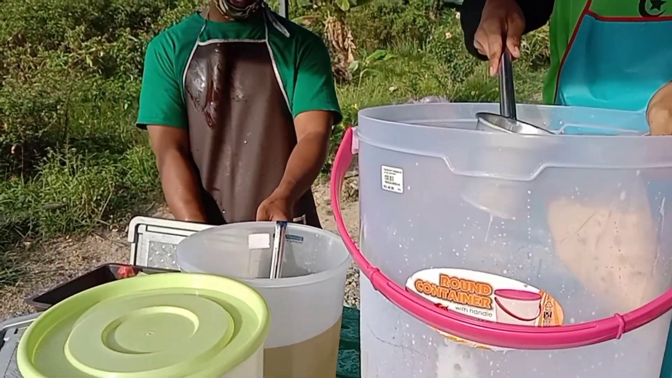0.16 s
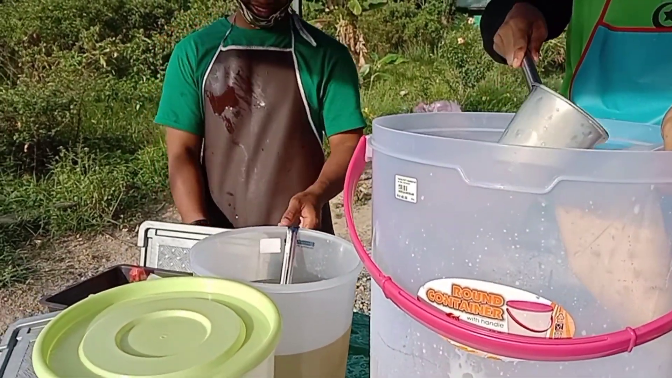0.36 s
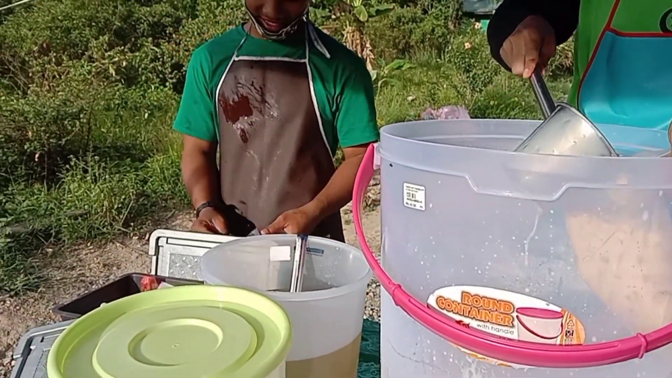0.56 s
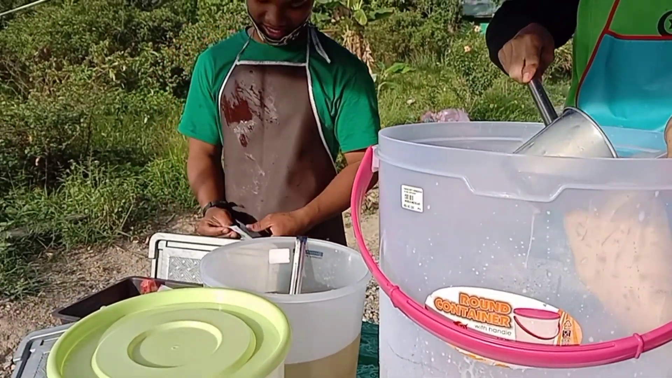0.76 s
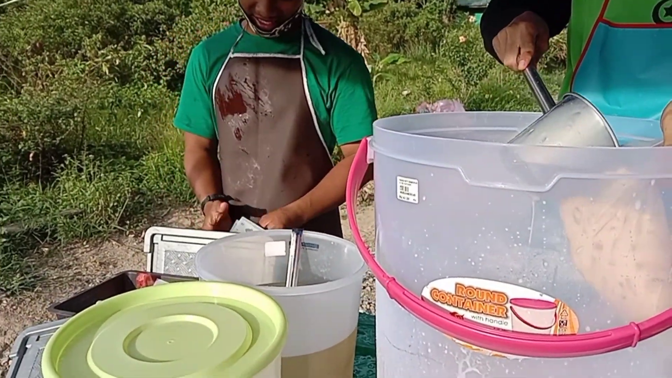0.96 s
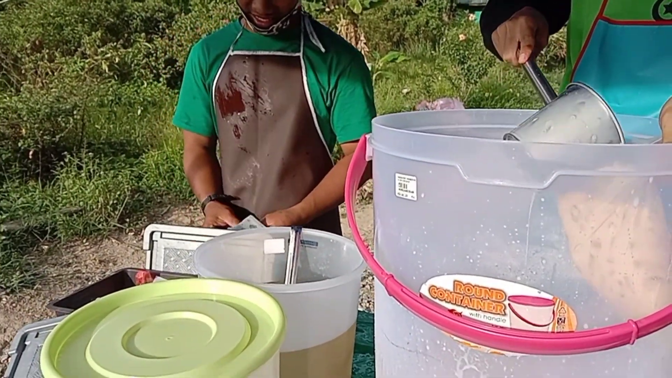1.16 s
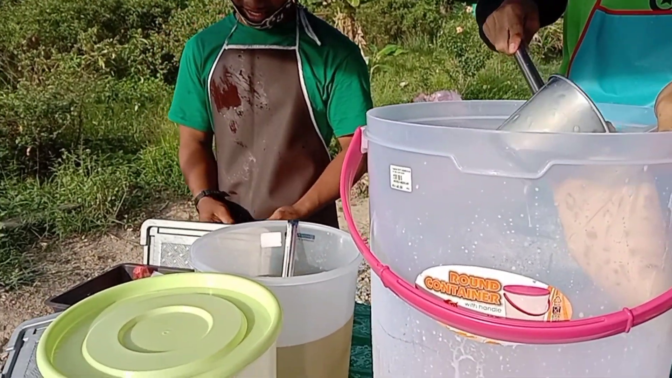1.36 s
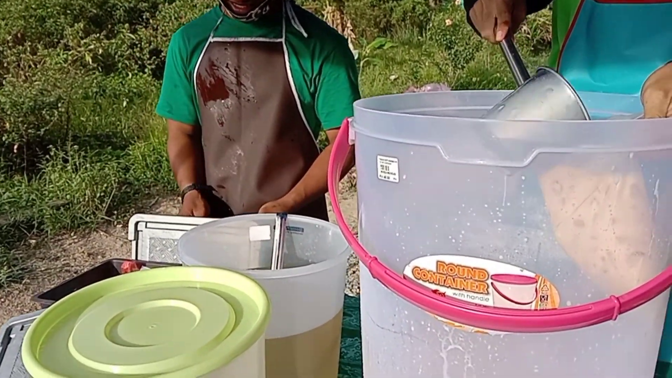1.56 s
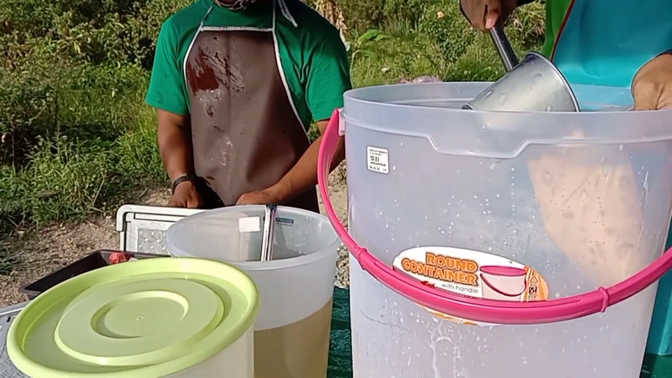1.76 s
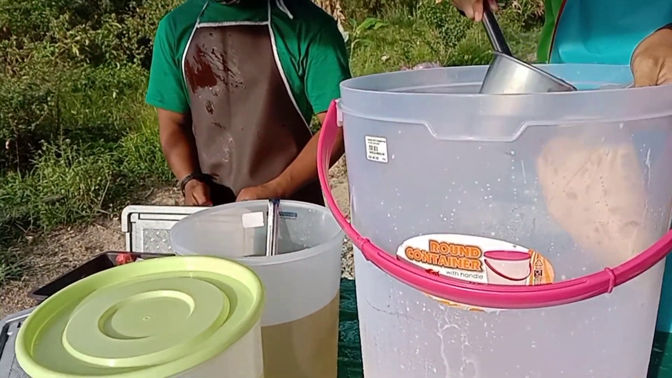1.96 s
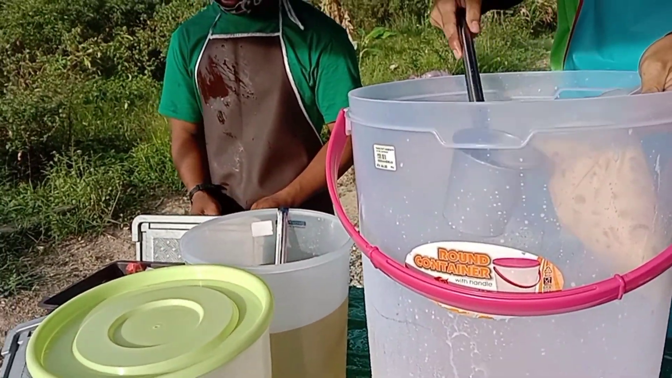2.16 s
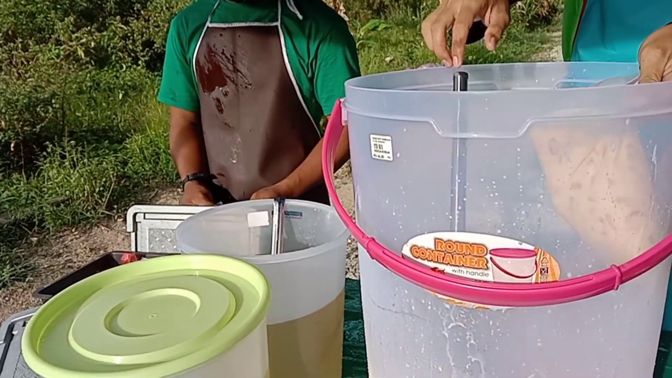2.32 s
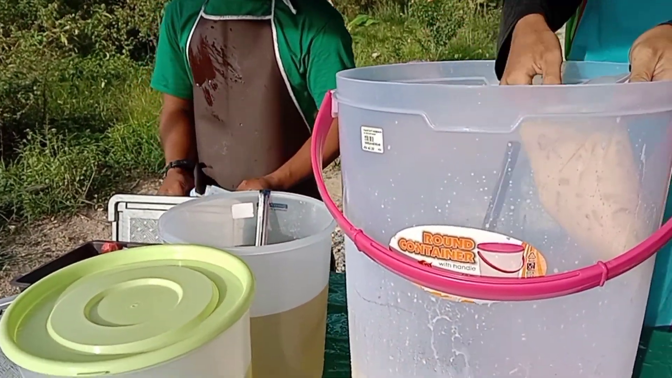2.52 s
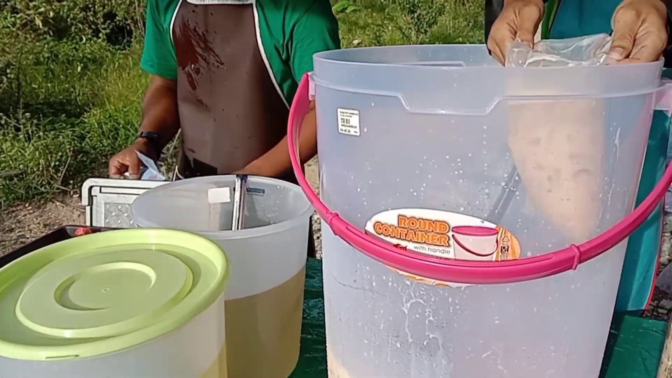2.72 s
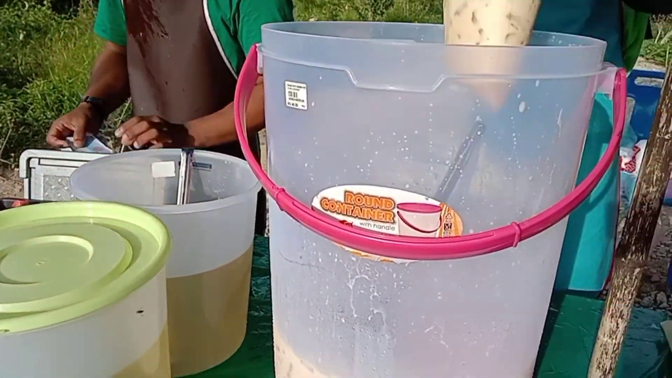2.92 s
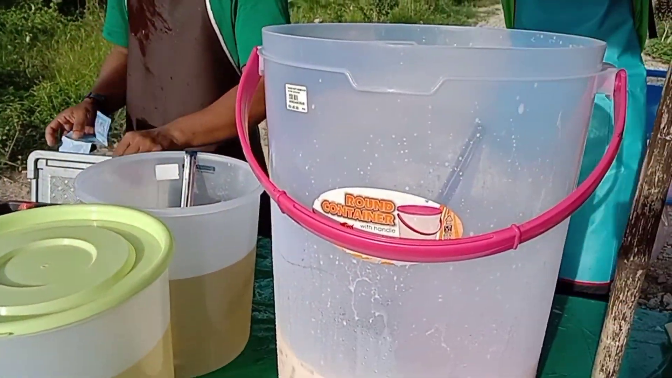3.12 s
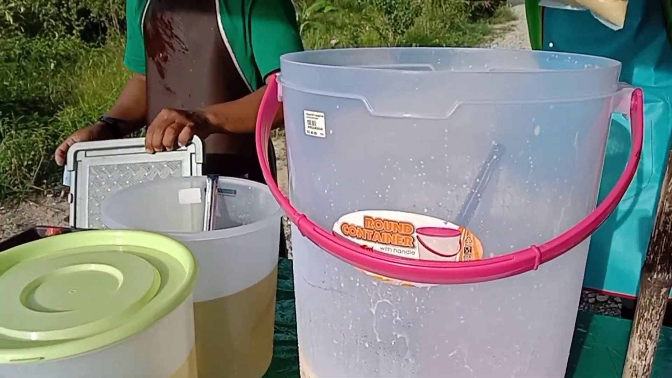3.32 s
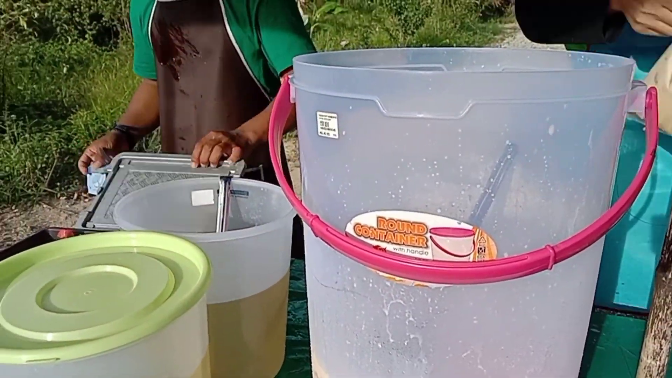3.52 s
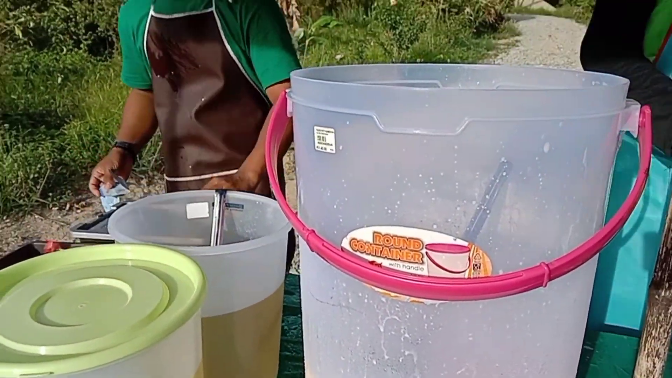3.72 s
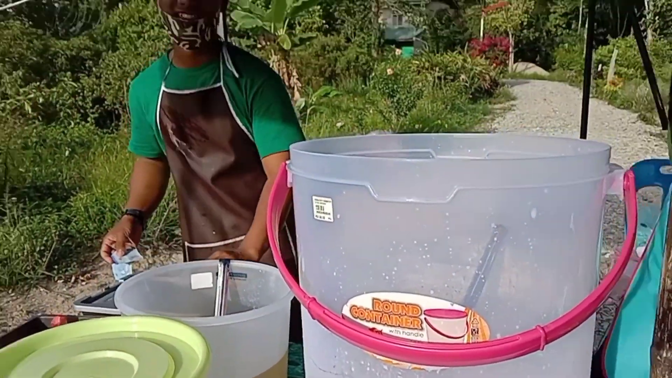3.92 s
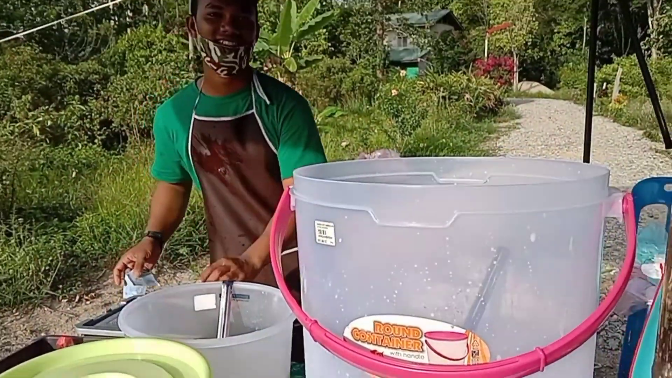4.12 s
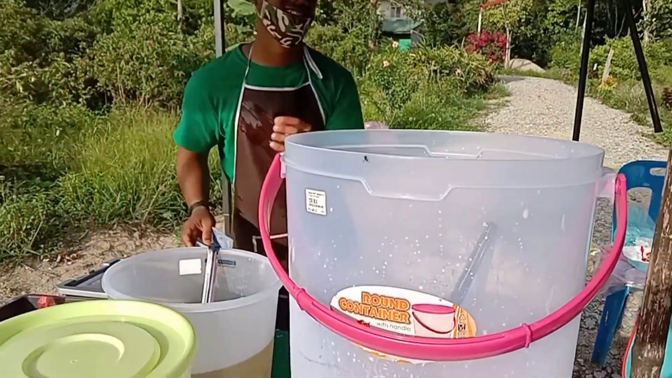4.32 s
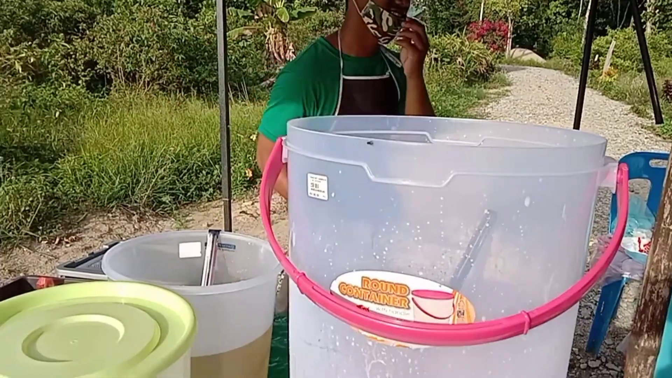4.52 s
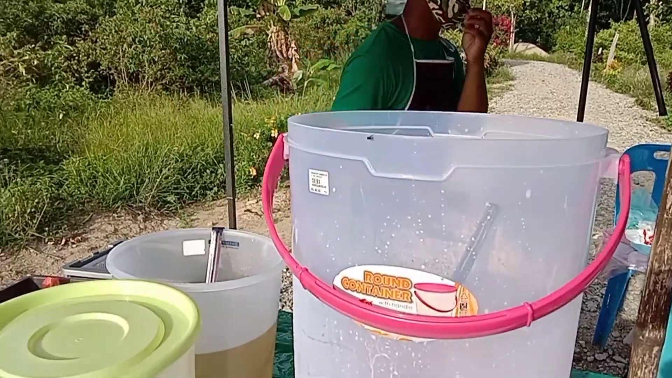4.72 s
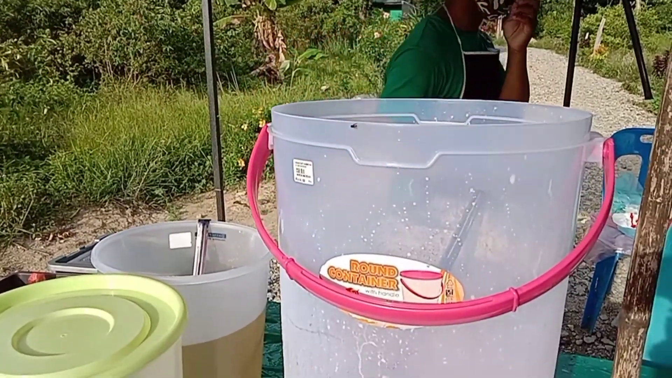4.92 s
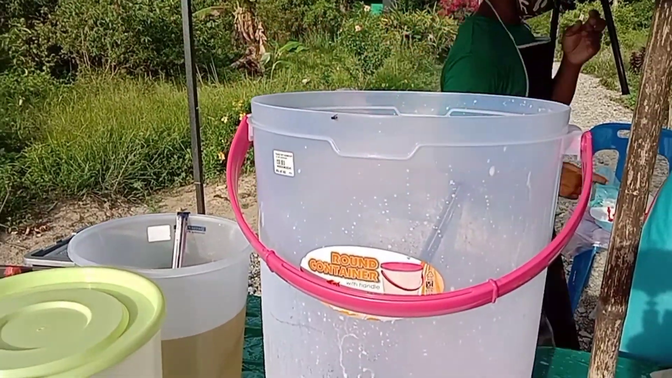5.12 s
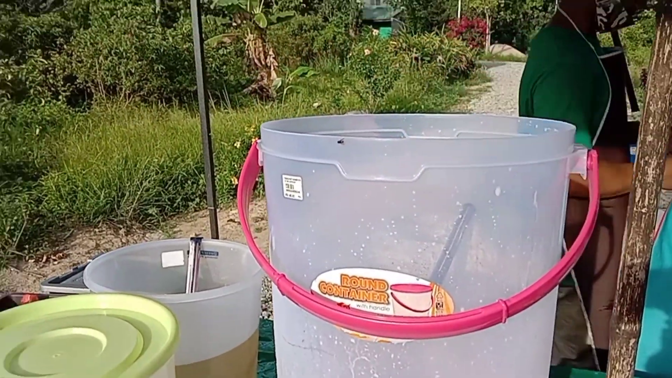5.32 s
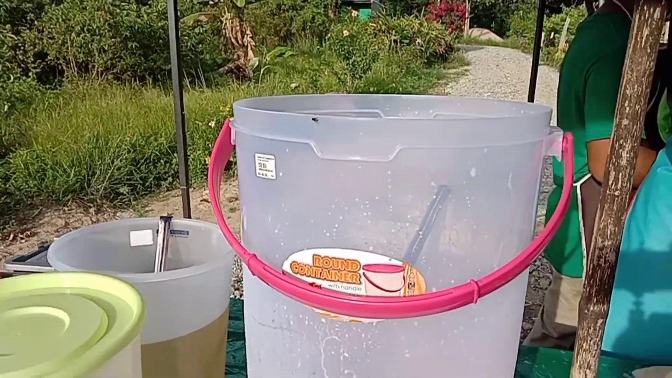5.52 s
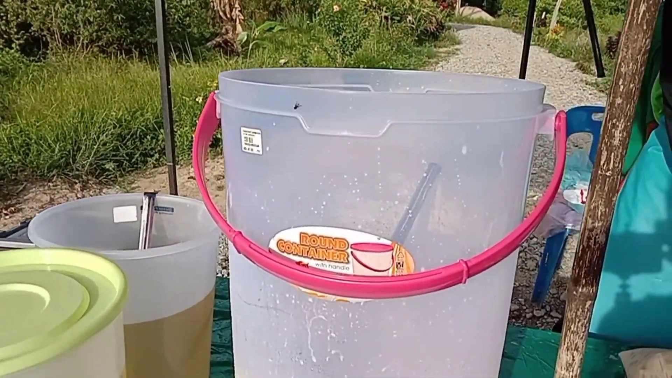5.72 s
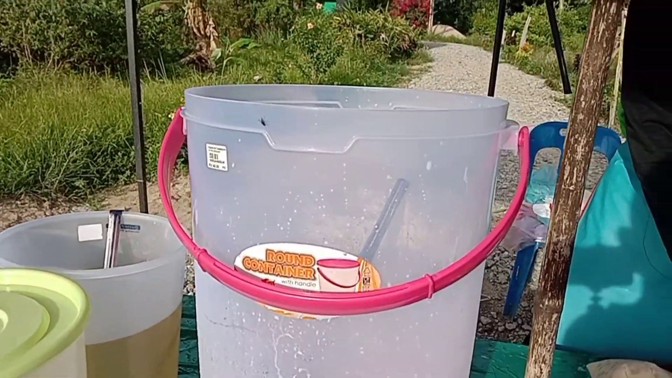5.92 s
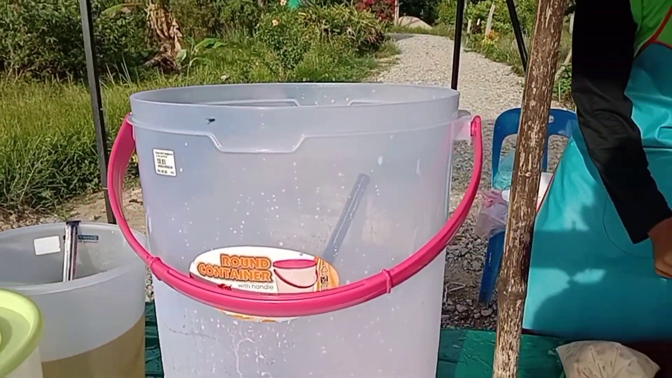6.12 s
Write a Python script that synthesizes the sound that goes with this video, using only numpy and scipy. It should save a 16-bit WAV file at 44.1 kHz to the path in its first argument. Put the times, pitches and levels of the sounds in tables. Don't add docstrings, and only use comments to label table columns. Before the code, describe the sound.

Hollow tub knocks and wet slosh give way to pouring gulps, a dipper plunge, bumps, and busy crisp crackling of thin plastic outdoors.

```python
import sys
import numpy as np
from scipy import signal
from scipy.fft import rfft, irfft
from scipy.io import wavfile
from scipy.ndimage import uniform_filter1d

SR = 44100
rng = np.random.default_rng(int(sys.argv[2]) if len(sys.argv) > 2 else 0)


def to_wav(sig):
    pcm = np.clip(np.atleast_2d(sig), -1, 1) * 32767
    pcm = np.round(pcm).astype(np.int16)
    wavfile.write(sys.argv[1], SR, pcm.T)


def gain_from_db(level_db):
    decades = np.asarray(level_db, float) / 20
    return 10 ** decades


N = 276663

# (frequency [Hz], level [dB per Hz])
AIR_SPECTRUM = [(30, 7.5), (164, 4), (575, -1.5), (1300, 6.5), (4200, 7.5), (5600, 9), (8900, -21),
                (15500, -14)]
# (time [s], rate [firings per s], level [dB])
ENGINE_RUN = [(0, 30.1, -62.5), (1.2, 30.0, -65.5), (2.3, 29.4, -72), (4.0, 29.4, -69.5), (6.27, 26, -76.5)]
# (frequency [Hz], width [Hz], level [dB])
EXHAUST_MODES = [(135, 50, -3), (172, 40, 0), (315, 50, -15)]
# (time [s], level [dB])
INSECT_SONG = [(0, -70), (2.4, -73), (3.7, -73), (4.2, -75), (6.27, -79)]
# (time [s], peak [dB], frequency [Hz], t60 [s])
TUB_RUMBLES = [
    (0.001, -27.5, 130.3, 0.2),
    (.03, -31, 510, 0.23),
    (.065, -29, 120, 0.3),
    (.125, -31, 180, 0.28),
    (2.454, -29.5, 290, 0.44),
    (2.452, -15.5, 1200, 0.57),
    (4.09, -48, 310, .15),
    (3.89, -27.5, 266, 0.2),
]
# (time [s], peak [dB], frequency [Hz], t60 [s])
TABLE_THUMPS = [(.147, -11, 216, 0.13), (.160, -8.5, 198, 0.06), (.176, -21, 146, 0.13),
                (.44, -18, 328, 0.036), (2.465, -25, 186, 0.46), (2.49, -27, 349, 0.41),
                (2.47, -38, 97, 0.27), (2.678, -16, 207, 0.27), (2.68, -35.5, 91, 0.2),
                (2.676, -10, 768, 0.18), (2.75, -23.5, 191, 0.07), (3.412, -42, 442, 0.41),
                (3.44, -29, 171, 0.072), (3.474, -33, 348, 0.15), (3.50, -40.5, 466, 0.22),
                (3.604, -36.5, 314, 0.13), (3.668, -34.5, 306, 0.088), (3.833, -7, 330, 0.11),
                (3.835, -26, 108, 0.21), (3.836, -18.5, 197, 0.17), (3.86, -22.5, 312, 0.083),
                (3.93, -32, 283, 0.164), (3.97, -29, 394, 0.032), (.435, -17.5, 540, 0.066),
                (4.16, -45.5, 446, 0.48), (4.18, -40.5, 103, 0.069)]
# (time [s], peak [dB])
TUB_KNOCKS = [(0.012, -14.5), (0.03, -20), (0.0709, -8.5), (0.1185, -12), (0.144, -15), (0.16, -17),
              (0.175, -16), (.225, -24), (.285, -30.5), (0.4181, -22.5), (0.431, -20.5), (0.438, -3),
              (0.445, -29.5), (0.479, -23), (0.512, -42), (2.465, -9.5), (2.484, -14.5), (2.499, -13),
              (2.519, -16.5), (2.545, -23), (2.6, -46.5), (2.675, -8.5), (2.697, -25), (2.712, -24.5),
              (2.74, -28), (3.821, -30), (3.472, -48), (3.834, -22), (3.858, -20)]
# (frequency [Hz], level [dB], t60 [s])
TUB_MODES = [(650, -16.5, 0.039), (750, 2, 0.011), (778.5, 1.5, 0.09), (880, -18.5, 0.12), (925, -11, 0.13),
             (1070, -19.5, 0.06), (1242, -5, 0.059), (1290, 8, 0.018), (1230, -12, 0.0088),
             (1914, -19.5, 0.0066), (2655, -8, 0.0054), (3300, -32.5, 0.0079)]
# (time [s], peak [dB], frequency [Hz], t60
# [s])
CLEAR_NOTES = [(.255, -33.5, 797, .5), (.43, -24.5, 3840, 0.072), (.446, -20, 1254, 0.054),
               (.495, -37.5, 1936, 0.18), (.908, -25.5, 2030, 0.047), (.93, -41, 1430, .1),
               (1.138, -34, 2866, 0.08), (2.07, -53, 2526, 0.24), (3.765, -51.5, 952, .1),
               (3.305, -50.5, 1530, 0.17), (1.866, -44, 4850, .08)]
# (time [s], peak [dB], frequency [Hz], t60 [s])
BAG_DRIPS = [(.93, -49, 925, 0.18), (1.02, -46.5, 518, 0.088), (1.365, -41.5, 1430, 0.098),
             (1.445, -51.5, 1070, 0.087), (1.55, -57, 1600, 0.092), (1.547, -38.5, 2570, 0.057),
             (1.615, -58.5, 2000, 0.22), (1.602, -57, 795, 0.52), (1.62, -59, 1304, 0.26),
             (1.74, -57.5, 1668, 0.29), (1.79, -34.5, 3300, 0.018), (1.905, -54, 1040, 0.12),
             (2.115, -41.5, 1290, 0.047), (2.165, -41, 1290, 0.092), (2.345, -58, 2470, 0.5),
             (3.135, -32.5, 2840, 0.03), (3.135, -45.5, 1252, 0.19)]

# (frequency [Hz], level [dB per Hz])
FILM_SPECTRUM = [(4200, 3.5), (5580, 4.5), (7660, -1.5), (9220, -11.5), (11900, -7.5), (14800, -9.5),
                 (15500, -6)]
# (frequency [Hz], level [dB per Hz])
WATER_SPECTRUM = [(1150, -6), (1390, 3), (1880, 0), (2810, 1), (3600, 0.5), (4400, -15)]
# (frequency [Hz], level [dB per Hz])
BODY_SPECTRUM = [(1200, -13.5), (1420, 8), (1690, 6.5), (2080, 0.5), (2800, -1.5), (3280, 4.5),
                 (3770, -3.5), (4400, -14.5)]
# (frequency [Hz], level [dB per Hz])
SLOSH_SPECTRUM = [(450, -20.5), (752, -4), (950, -8.5), (1140, -10), (1250, -4)]
# (frequency [Hz], level [dB per Hz])
UNDERSIDE_SPECTRUM = [(450, -20), (801, -15), (1250, -7.5)]
# (time [s], level [dB])
HAND_ACTIVITY = [(0, -38), (.23, -47), (.6, -59.5), (1.08, -48.5), (1.87, -61), (2.39, -59), (2.5, -39),
                 (2.62, -62), (2.68, -46), (2.81, -38), (3.25, -58.5), (3.6, -56.5), (4.16, -49),
                 (4.63, -52), (4.75, -65.5), (4.99, -50), (5.58, -58), (6.27, -60)]
STILL_TIMES = [1.71, 2.01, 2.28, 3.26, 4.86]
# (time [s], level [dB], rise [s], t60 [s])
TUB_ROCKING = [
    (0, -25.5, 0.00041, 0.44),
    (2.52, -19.5, 0.2, 0.73),
]

# (time [s], peak [dB], body [dB re peak], t60 [s])
DIPPER_SPLASHES = [
    (.002, -49, 27, .15),
    (.068, -37, 19, 0.13),
    (.1106, -30, 10, 0.22),
    (.1294, -38, 5.5, 0.19),
    (.2735, -44.5, -7.5, 0.23),
    (.3337, -26.5, -20.5, 0.31),
    (.3935, -47.5, -2, 0.61),
    (.4205, -17, 3, 0.11),
    (.4994, -51, 11.5, 0.15),
]
# (time [s], peak [dB], body [dB re peak], t60 [s])
DIPPER_PLUNGE = [
    (2.452, -8, -0.5, 0.27),
]
# (time [s], peak [dB], body [dB re peak], t60 [s])
POURED_GULPS = [(.6255, -38.5, -3.5, 0.23), (.6995, -45, 1, 0.12), (.8594, -39, -5.5, 0.21),
                (.9064, -33.5, 3, 0.16), (1.0061, -35, 6.5, 0.1), (1.064, -33.5, 11, .044),
                (1.1324, -30, -0.5, 0.08), (1.1974, -28.5, 2.5, 0.095), (1.2403, -32, 6.5, 0.084),
                (1.3096, -57, -19, 0.071), (1.3583, -35.5, -2.5, 0.19), (1.4408, -24, -13.5, 0.075),
                (1.5455, -49.5, 6.5, 0.08), (1.6142, -38.5, -3.5, 0.12), (1.7903, -37, -12, 0.04),
                (1.8662, -53.5, -11, 0.14), (1.9024, -67, 12.5, 0.13), (2.0842, -46.5, 3.5, 0.14),
                (2.1081, -39.5, -2, 0.22), (2.1563, -28.5, -9.5, 0.12), (2.3458, -32, -10.5, 0.076)]
# (time [s], peak [dB], body [dB re peak], t60 [s])
BAG_BUMPS = [
    (2.5744, -36, 6.5, 0.16),
    (2.674, -13.5, -4.5, 0.15),
    (2.7757, -27, -6, 0.08),
    (3.4095, -33, 2.5, 0.053),
    (3.4705, -39.5, 3.5, 0.12),
    (3.599, -41, 2.5, 0.084),
    (3.7939, -39.5, -7.5, 0.084),
    (3.8139, -24.5, 1.5, 0.21),
    (3.942, -31, -1, 0.053),
    (3.964, -38.5, -6.5, 0.063),
]
# (time [s], peak [dB], body [dB re peak], t60 [s])
GATHERING_SNAPS = [(2.5986, -30, -1, 0.34), (2.883, -21, -8.5, 0.15), (2.9638, -20, -13, .025),
                   (3.0007, -37.5, 5.5, 0.054), (3.0428, -35, -9, 0.029), (3.08, -35, -11.5, 0.021),
                   (3.1312, -31, -7.5, 0.15), (3.3454, -30.5, -7, 0.041), (3.3733, -40, -1, 0.024),
                   (3.52, -40, -5, 0.18), (3.63, -40, -10.5, 0.073), (3.75, -43, -9, 0.078),
                   (4.0355, -20.5, -39, 0.016), (4.0923, -29.5, -15.5, 0.068), (4.1286, -31, -5.5, 0.3),
                   (4.1695, -52, 11, 0.53), (4.2046, -39, -27, 0.024), (4.2623, -35.5, -6, 0.26),
                   (4.3081, -26, -6.5, 0.052)]
# (time [s], peak [dB], body [dB re peak], t60 [s])
TYING_SNAPS = [(4.4085, -30.5, -12, 0.17), (4.4365, -30.5, -9, 0.047), (4.452, -29.5, -15, 0.13),
               (4.4832, -32, -1.5, 0.33), (4.5646, -17, -7.5, 0.24), (4.5969, -20.5, -19.5, 0.037),
               (4.6255, -23, -40, 0.066), (4.6569, -21.5, -15.5, 0.028), (4.677, -29.5, -18, 0.046),
               (4.7164, -32.5, -18, 0.064), (4.7439, -35.5, -12.5, 0.51), (4.7657, -26.5, -9, 0.1),
               (4.7967, -26.5, -8.5, 0.034), (4.809, -29.5, -8.5, 0.024), (4.8969, -38.5, -28, 0.049),
               (4.9089, -16, -21, 0.15), (4.932, -35.5, -3, 0.064), (4.9657, -28, -5, 0.11),
               (4.984, -29.5, -0.5, 0.25), (5.022, -18.5, -8.5, 0.072), (5.081, -27.5, -1, 0.14),
               (5.1169, -30.5, -9, 0.041), (5.211, -37, -6, 0.43), (5.2833, -29, -7.5, 0.24),
               (5.3039, -28.5, 5, 0.041), (5.374, -35.5, -4.5, 0.32), (5.4118, -26.5, -8.5, 0.088)]
# (time [s], peak [dB], body [dB re peak], t60 [s])
CARRYING_SNAPS = [(5.4687, -37.5, -10, .13), (5.499, -24.5, -15, 0.043), (5.5379, -31, -17.5, 0.015),
                  (5.6173, -36, -7.5, 0.04), (5.6548, -32, -0.5, 0.061), (5.7619, -24.5, -7.5, 0.048),
                  (5.7998, -31.5, -5, 0.38), (5.8612, -28, -6.5, 0.025), (5.8795, -31.5, -16, .028),
                  (5.915, -37.5, -9, 0.075), (6.0064, -35.5, -6, 0.19), (6.062, -25.5, -8.5, 0.094),
                  (6.0927, -30.5, -16.5, 0.033), (6.1885, -37, -11.5, .081), (6.2379, -37, -4, 0.081)]
# (time [s], peak [dB], body [dB re peak])
CREASE_TICKS = [(0.006, -38, 6), (0.0422, -32, -7), (0.0705, -27.5, 9), (0.1511, -25.5, 14.5),
                (0.2357, -27, -6), (0.2744, -23.5, -17), (0.2982, -34, -9), (0.4254, -17.5, -4),
                (0.4322, -16, -1.5), (0.9243, -45.5, -24), (0.9289, -32.5, 9), (1.0137, -35, -44),
                (1.1988, -24.5, -10), (1.3132, -40, -23), (1.4412, -33.5, -22.5), (2.4646, -15, 5.5),
                (2.603, -31, 10.5), (2.6765, -19, 1), (2.6987, -21, 5), (2.7064, -22, 1.5),
                (2.7338, -44, -16), (2.7449, -23, -19), (2.7757, -15.5, -29), (2.7804, -15.5, -16),
                (2.815, -22, -11), (2.884, -26, -9), (2.8898, -18, -15), (2.9034, -17, -19),
                (2.9649, -17.5, -23), (3.0015, -23, -0.5), (3.044, -25.5, -29), (3.0485, -21, -11.5),
                (3.0799, -21, -29.5), (3.1158, -33, -26), (3.1337, -26, -15), (3.3437, -31, -11.5),
                (3.3741, -35.5, -16.5), (3.4107, -28.5, -8), (3.4168, -28, -4.5), (3.4738, -28.5, -3),
                (3.6234, -28.5, -2), (3.6785, -33.5, -16), (3.7933, -22.5, -13), (3.8144, -19, -22.5),
                (3.8212, -14.5, -14.5), (3.827, -30, -10), (3.9452, -20, -10.5), (3.9643, -29, -10.5),
                (4.036, -24.5, -24.5), (4.094, -20.5, -27), (4.1326, -18, -36), (4.1434, -31.5, -15.5),
                  (4.1547, -19.5, -18), (4.2064, -19, -22), (4.2609, -22, -10), (4.2753, -25.5, -17),
                  (4.3815, -34, -24.5), (4.387, -40.5, -15.5), (4.4083, -35, -11), (4.419, -21, -21),
                  (4.437, -33, -12), (4.4401, -28, -21), (4.4527, -15, -23), (4.459, -26, 0),
                  (4.4848, -14.5, -4), (4.4892, -32, -22), (4.4935, -35, -15), (4.5034, -28.5, -10),
                  (4.551, -22, -1), (4.554, -23, -17), (4.563, -11.5, -7), (4.5722, -15, -19),
                  (4.575, -15.5, -14), (4.5951, -20.5, -13), (4.5989, -12, -27), (4.6036, -19, -13),
                  (4.6273, -16, -15), (4.6335, -21, -14), (4.6408, -26, -16), (4.657, -9.5, -14.5),
                  (4.6629, -22, -25), (4.6766, -19.5, -6), (4.7116, -31.5, -28), (4.718, -26.5, -24.5),
                  (4.7229, -34, -16), (4.7458, -30.5, -21), (4.7706, -29.5, -13), (4.7979, -25.5, -9),
                  (4.808, -27.5, -9), (4.8149, -36, -10),
                (4.8961, -20, -24), (4.9118, -14.5, -21.5), (4.9166, -21, -19), (4.9324, -22.5, -16.5),
                  (4.9363, -24, -8), (4.9518, -21, -8), (4.9856, -26, -15), (4.9927, -27.5, -12),
                  (5.0082, -31, -6), (5.0257, -19, -22), (5.033, -17.5, 2.5), (5.0832, -18.5, -1),
                  (5.1162, -17.5, -8), (5.1213, -42, -13), (5.2122, -24.5, -4), (5.2381, -32, -18),
                  (5.2468, -32, -17), (5.2857, -34, -13), (5.2904, -38, -10), (5.3036, -16, 2),
                  (5.3747, -28.5, -22), (5.4173, -22, -0.5), (5.4708, -26, -4.5), (5.5009, -34.5, -20),
                  (5.5397, -35, -20), (5.5739, -42.5, -31), (5.5931, -36, -4.5), (5.6175, -28.5, -19),
                  (5.6544, -25.5, -5), (5.7249, -36, -18.5), (5.7571, -26.5, -14), (5.763, -31.5, -14.5),
                  (5.7987, -25, -18), (5.8107, -31, -17), (5.8252, -22.5, -3), (5.8395, -21.5, -4.5),
                  (5.8642, -21, -22), (5.8784, -15.5, -19), (5.8842, -21, -15), (5.9278, -36.5, -7),
                  (5.9567, -28.5, -19.5), (6.0073, -31.5, -11.5), (6.0854, -27, -14), (6.0935, -21.5, -23),
                  (6.099, -28.5, -20), (6.1377, -31.5, -25), (6.1897, -38, -20.5), (6.2389, -29, -19.5)]


def rms_one(x):
    return x / np.sqrt(np.mean(x ** 2) + 1e-20)


def in_time(rows):
    s, *columns = np.transpose(rows)
    return [np.interp(np.arange(N) / SR, s, column) for column in columns]


def at_hz(points, hz):
    point_hz, point_db = np.array(points).T
    return np.interp(np.log(hz), np.log(point_hz), point_db)


def drift(rate_hz):
    r = np.exp(-80 * np.pi * rate_hz / SR)
    slow = signal.lfilter([1], [1, -2 * r, r * r], rng.standard_normal(N // 40 + 2002))[2000:]
    return np.interp(np.arange(N) / 40, np.arange(len(slow)), rms_one(slow))


def highpass(x, hz, order=2):
    return signal.sosfilt(signal.butter(order, hz, "high", fs=SR, output="sos"), x)


def ring(clicks, hz, t60):
    r, w = gain_from_db(-60 / (t60 * SR)), 2 * np.pi * hz / SR
    return signal.lfilter([0, np.sin(w)], [1, -2 * r * np.cos(w), r * r], clicks + 1e-18)


def resonance(x, hz, width_hz):
    r = np.exp(-np.pi * width_hz / SR)
    feedback = [1, -2 * r * np.cos(2 * np.pi * hz / SR), r * r]
    return signal.lfilter([(1 - r * r) / 2, 0, (r * r - 1) / 2], feedback, x + 1e-18)


def steep_resonance(x, hz, width_hz):
    return resonance(resonance(x, hz, width_hz), hz, width_hz)


def add(track, s, piece):
    at = max(round(s * SR), 0)
    track[at:at + len(piece)] += piece[:N - at]


def lulls():
    t = np.arange(N) / SR
    return -6 * sum(np.exp(-((t - s) / 0.06) ** 2) for s in STILL_TIMES)


def air():
    hz = np.maximum(np.fft.rfftfreq(N, 1 / SR), 10)
    floor = irfft(rfft(rng.standard_normal(N)) * gain_from_db(at_hz(AIR_SPECTRUM, hz)), N)
    gust_db = 1.5 * drift(1.8)
    return gain_from_db(-57.5 + gust_db + lulls() / 2) * rms_one(floor)


def engine():
    per_s, db = in_time(ENGINE_RUN)
    firings = np.diff(np.floor(np.cumsum(per_s) / SR), prepend=0)
    pulses = firings * gain_from_db(0.3 * rng.standard_normal(N))
    exhaust = sum(gain_from_db(g) * steep_resonance(pulses, hz, 1.3 * width) for hz, width, g in EXHAUST_MODES)
    return gain_from_db(db - 0.5) * rms_one(exhaust)


def insect():
    song = steep_resonance(rng.standard_normal(N), hz=8700, width_hz=150)
    return gain_from_db(in_time(INSECT_SONG)[0]) * rms_one(song)


def struck_notes(rows, rise_s, cycles, push_db, rough_db):
    out, t = np.zeros(N), np.arange(9000) / SR
    for (s, db, hz, t60), noise in zip(rows, rng.standard_normal((len(rows), len(t)))):
        push = np.sin(2 * np.pi * hz * t) * gain_from_db(-30 * t / t60)
        rough = rms_one(steep_resonance(noise, hz, hz / cycles))
        envelope = gain_from_db(db - 60 * t / t60) * (1 - np.exp(-t / rise_s))
        add(out, s, envelope * (gain_from_db(push_db) * push + gain_from_db(rough_db) * rough))
    return out


def rumbles():
    return struck_notes(TUB_RUMBLES, rise_s=0.0076, cycles=1.5, push_db=-11.5, rough_db=-6.5)


def thumps():
    return struck_notes(TABLE_THUMPS, rise_s=0.00044, cycles=1.66, push_db=-4.0, rough_db=-7.5)


def knocks():
    luck, out = rng.standard_normal((len(TUB_KNOCKS), len(TUB_MODES))), np.zeros(N)
    for k, (hz, mode_db, t60) in enumerate(TUB_MODES):
        clicks = np.zeros(N)
        for (s, db), chance in zip(TUB_KNOCKS, luck[:, k]):
            add(clicks, s, gain_from_db([db + mode_db - 12 + 3.0 * chance]) * np.sign(chance))
        out += ring(clicks, hz, t60)
    return highpass(out, 350)


def clinks():
    return struck_notes(CLEAR_NOTES, rise_s=0.0033, cycles=10, push_db=0, rough_db=-3.0)


def drips():
    return struck_notes(BAG_DRIPS, rise_s=0.001, cycles=16.0, push_db=-7.5, rough_db=1.0)


def ticks():
    rows, t = CREASE_TICKS, np.arange(900) / SR
    snap, body = np.zeros(N), np.zeros(N)
    for (s, db, body_db), noise in zip(rows, rng.standard_normal((len(rows), len(t)))):
        crack = noise * np.exp(-t / 0.0003)
        tail = gain_from_db(-13) * noise * np.exp(-t / 0.006) / 2
        add(snap, s, gain_from_db(db + 2) * (crack / np.abs(crack).max() + tail))
        hz = 1520 * gain_from_db(1.3 * noise[-1])
        add(body, s, gain_from_db(db + body_db - 8 - 60 * t / 0.025) * np.sin(2 * np.pi * hz * t))
    mixed = 0.52 * highpass(snap, 1700) + 0.88 * resonance(snap, 7200, 2000) + body
    return highpass(mixed, 1000, order=4)


def with_low(rows, low_db, share):
    return [(s, db, body, low_db + share * body, t60) for s, db, body, t60 in rows]


def splashes():
    return (with_low(DIPPER_SPLASHES, 3.1, 0.69) + with_low(DIPPER_PLUNGE, -8, 0)
            + with_low(POURED_GULPS, -21, 1))


def snaps():
    return (with_low(BAG_BUMPS, -0.53, 0.26) + with_low(GATHERING_SNAPS, -56, 0.88)
            + with_low(TYING_SNAPS, -19, 1) + with_low(CARRYING_SNAPS, -40, 0.59))


def steady_levels():
    film_db, t = in_time(HAND_ACTIVITY)[0] + lulls(), np.arange(N) / SR
    busier_db = film_db + 48
    low = gain_from_db(-68.5 + busier_db)
    for s, db, rise_s, t60 in TUB_ROCKING:
        add(low, s, gain_from_db(db - 60 * t / t60) * (1 - np.exp(-t / max(rise_s, 0.001))))
    return film_db, -51 + busier_db, 20 * np.log10(low)


def grains(per_s, spread_db):
    born = rng.random(N) < per_s * gain_from_db(3.0 * drift(25)) / SR
    strength = gain_from_db(spread_db * np.minimum(rng.exponential(1, N), 4))
    return rms_one(born * strength * rng.choice([-1, 1], N))


def zone(together, flutter, spectra, low_hz, high_hz, steady_db, burst_db, per_s, slower, patchy_db,
         crack_db, count):
    t, bursts = np.arange(7000) / SR, splashes() + snaps()
    rises = [0.051 * row[4] for row in splashes()] + [0.0004 + 0.008 * row[4] for row in snaps()]
    shapes = []
    for row, rise in zip(bursts, rises):
        decay = gain_from_db(-60 * t / max(row[4] * slower, 0.01))
        shapes.append(decay * (1 - np.exp(-t / rise)))
    favour = rng.standard_normal((len(bursts), count))
    sides = np.sign(rng.standard_normal(len(bursts)))
    edges = np.geomspace(low_hz, high_hz, count + 1)
    gains = [gain_from_db(at_hz(spectrum, np.sqrt(edges[1:] * edges[:-1]))) for spectrum in spectra]
    wet, dry = [g / np.sqrt(np.sum(g ** 2 * np.diff(edges)) / (SR / 2)) for g in gains]
    cracks = np.zeros(N)
    for row, db, rise, side in zip(bursts, burst_db, rises, sides):
        add(cracks, row[0] + 0.0014, side * gain_from_db([db + crack_db - 1500 * rise]))
    sources, out = [grains(per_s, 1.5), grains(per_s, 1.6)], 0
    before_lift = np.arange(N) < 4.02 * SR
    for k in range(count):
        level = gain_from_db(steady_db + patchy_db * (drift(19) + 0.41 * together))
        for row, db, shape, luck in zip(bursts, burst_db, shapes, favour[:, k]):
            add(level, row[0], gain_from_db(db + patchy_db * luck) * shape)
        excitation = level * flutter * sources[k % 2] + cracks * (-1) ** k
        band = signal.sosfilt(signal.butter(2, edges[k:k + 2], "band", fs=SR, output="sos"), excitation)
        out = out + np.where(before_lift, wet[k], dry[k]) * band
    return out


def bag_and_drink():
    film_db, body_db, slosh_db = steady_levels()
    peak, body, tub = np.array([row[1:4] for row in splashes() + snaps()]).T
    strays = signal.lfilter([1], [1, -0.992], np.abs(grains(110, 4.5)) / 30)
    together = drift(31) + 0.46 * np.log1p(strays)
    flutter = gain_from_db(2.0 * drift(47)) * (1 + strays) ** 0.12
    film = zone(together, flutter, (FILM_SPECTRUM, FILM_SPECTRUM), 4636, 16500, film_db, peak - 11,
                per_s=3300, slower=1.0, patchy_db=2.0, crack_db=6, count=7)
    filled = zone(together, flutter, (WATER_SPECTRUM, BODY_SPECTRUM), 1184, 4476, body_db, peak + body - 7,
                  per_s=2100, slower=1.12, patchy_db=1.0, crack_db=8, count=12)
    low = zone(together, flutter ** 0.1, (SLOSH_SPECTRUM, UNDERSIDE_SPECTRUM), 397.5, 1237, slosh_db,
               peak + tub - 8, per_s=1600, slower=1.57, patchy_db=2.5, crack_db=9.0, count=6)
    return film + filled + low


def scene():
    far = air() + engine() + insect()
    near = rumbles() + thumps() + knocks() + clinks() + drips() + ticks() + bag_and_drink()
    dull = signal.lfilter([0.4], [1, -0.6], near)
    echo = gain_from_db(-12.0) * np.pad(dull, (round(0.007 * SR), 0))[:N]
    return (near + echo + far)[None]


def suppress(x, strength, hold, depth_db, low_hz, high_hz):
    hz, _, z = signal.stft(x, SR, nperseg=1024, noverlap=768)
    power = uniform_filter1d(np.abs(z) ** 2, size=2, axis=-2)
    power = uniform_filter1d(power, size=2, axis=-1) + 1e-18
    hold = min(hold, 0.9)
    power = np.maximum(power / 2, signal.lfilter([1 - hold], [1, -hold], power, axis=-1))
    usual = uniform_filter1d(np.quantile(power, 0.25, axis=-1, keepdims=True), size=15, axis=-2)
    gain = np.maximum(1 / (1 + (strength * usual / power) ** 3), gain_from_db(depth_db))
    share = (1 / (1 + (hz / high_hz) ** 16) / (1 + (low_hz / (hz + 1)) ** 2))[:, None]
    return signal.istft(z * gain ** (share / 2), SR, nperseg=1024, noverlap=768)[1][..., :N]


def top_cut(x):
    return signal.sosfilt(signal.butter(12, 16810, fs=SR, output="sos"), x)


def record(dry):
    x = highpass(dry, 64)
    x = suppress(x, strength=2.2, hold=0.55, depth_db=-33, low_hz=895, high_hz=5170)
    rounded = 0.9 * np.tanh(x / 0.9)
    mix = signal.sosfilt(signal.ellip(10, 0.5, 26, 15620, fs=SR, output="sos"), rounded)
    return top_cut(mix)


dry = scene()
out = record(dry)
to_wav(out)
```